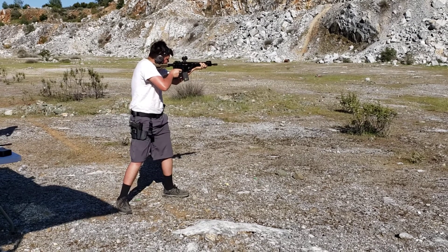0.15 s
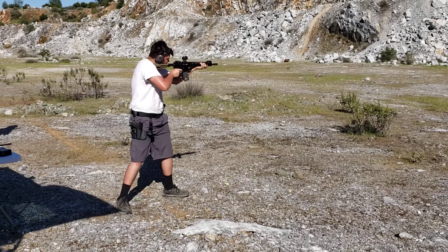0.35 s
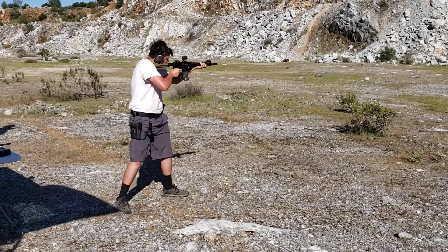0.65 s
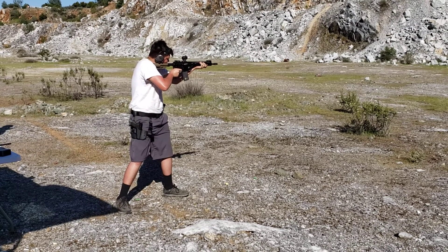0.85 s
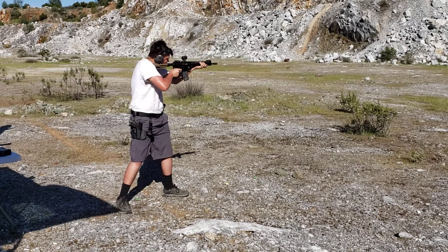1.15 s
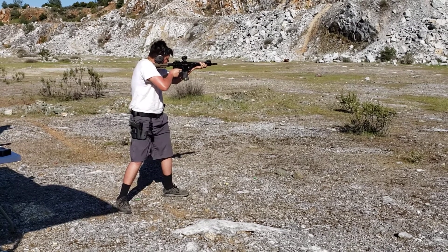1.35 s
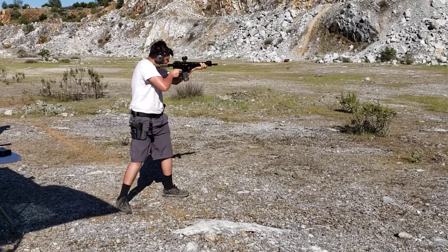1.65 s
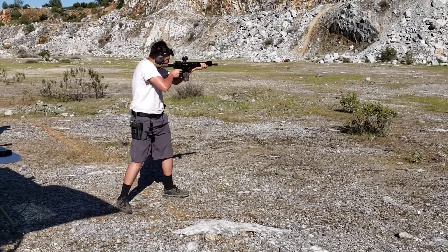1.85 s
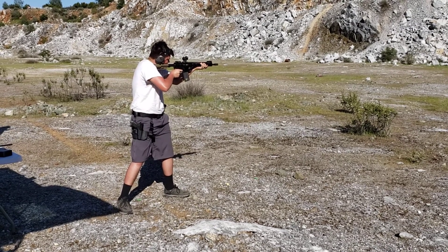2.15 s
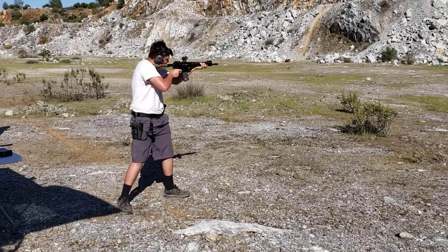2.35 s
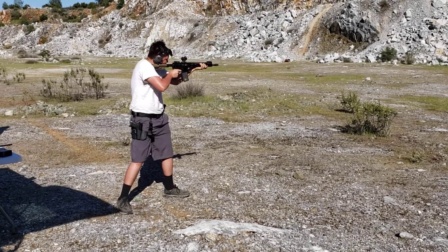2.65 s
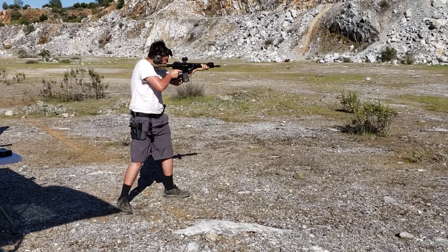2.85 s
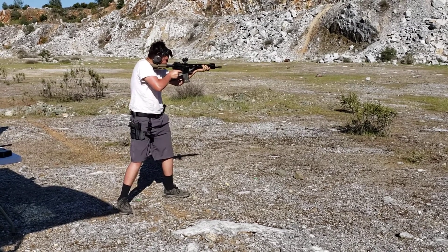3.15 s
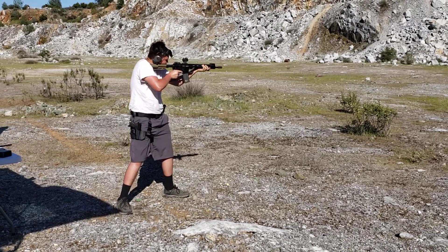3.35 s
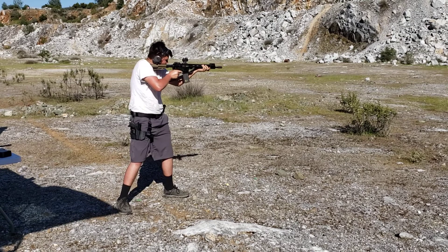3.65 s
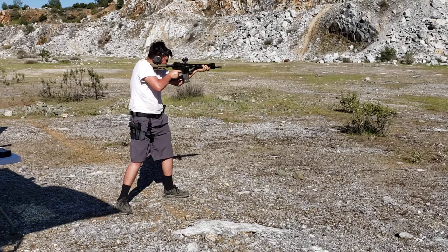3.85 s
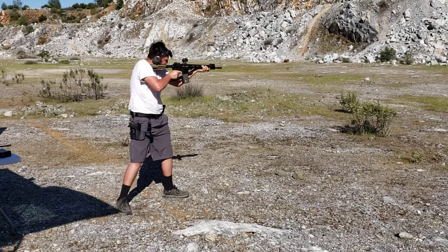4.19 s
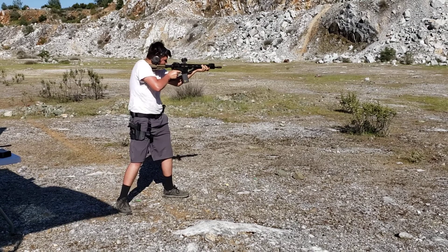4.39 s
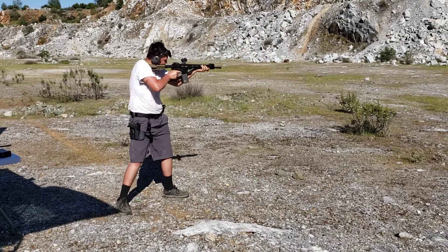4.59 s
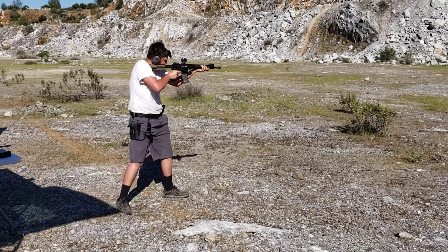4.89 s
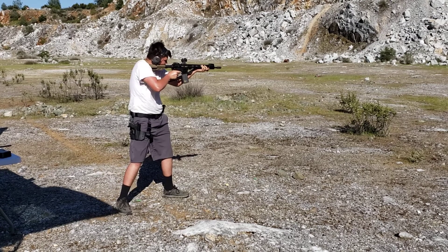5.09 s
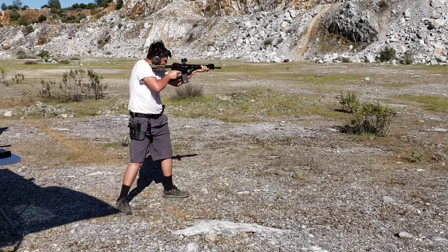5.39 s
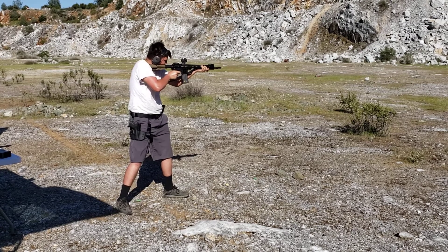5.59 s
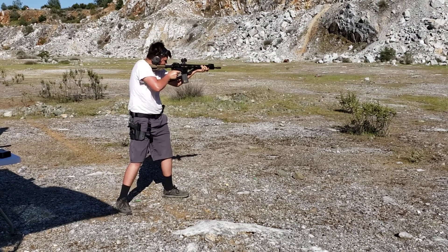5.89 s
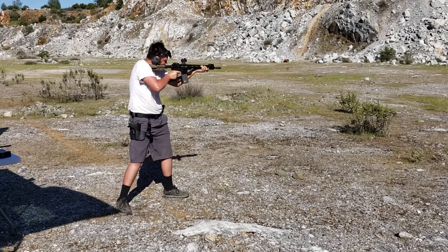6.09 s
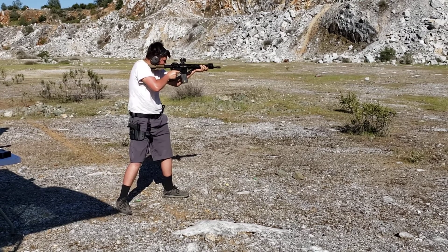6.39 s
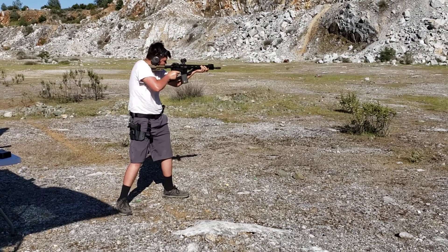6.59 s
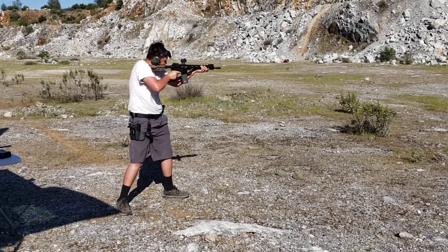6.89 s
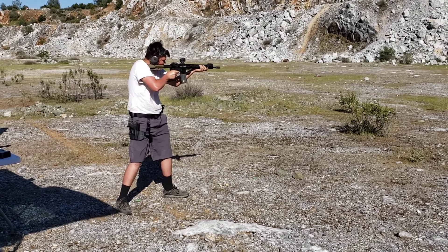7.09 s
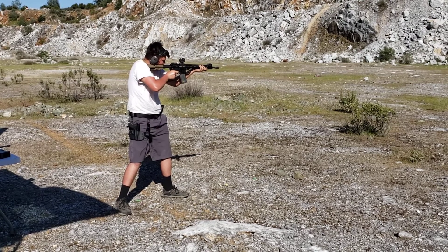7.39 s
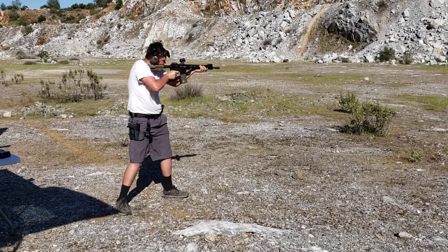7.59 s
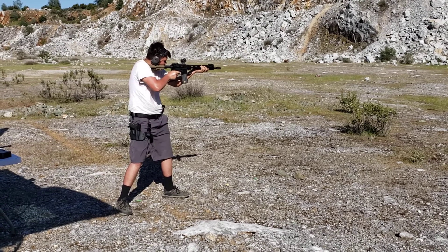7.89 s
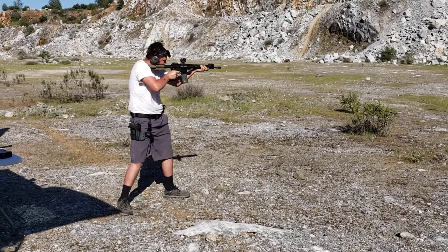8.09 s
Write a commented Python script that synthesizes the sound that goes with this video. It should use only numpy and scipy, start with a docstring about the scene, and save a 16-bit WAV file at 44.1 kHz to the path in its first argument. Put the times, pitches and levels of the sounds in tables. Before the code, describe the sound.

Heard in stereo from a few metres away, a rifle cracks six times in a wide rocky pit, slowly at first, then closer together. Steel answers almost at once, later for the far plate, with a hard slap and brief rough metallic ring; the fifth shot only returns a faint bullet crack. Slopes scatter each blast into a grainy, dulling roll. Between shots come soft air, faint rustle, small clicks and a low engine far off.

```python
"""A rifle fires six shots in a quarry, a few metres from the microphone, as an earlier shot still rolls away.
Each report is shock fronts, a deep thump, shaped noise and hollow tones; rock faces and three rubble slopes
throw it back as delayed noise for about a second. Five bullets clang on a near or a far steel plate, made of
noise slaps and rough, decaying sines. Bullet cracks return and spent cases tick as short noise bursts;
far off, sines make an engine's hum, over soft noise for still air and a faint rustle."""
import sys
import numpy as np
from scipy import signal
from scipy.fft import rfft, irfft, next_fast_len
from scipy.io import wavfile
from scipy.ndimage import uniform_filter1d, map_coordinates

SR = 44100
rng = np.random.default_rng(int(sys.argv[2]) if len(sys.argv) > 2 else 0)


def dump(signal):
    """Clip the signal to [-1, 1] and save it as 16-bit WAV at the path in sys.argv[1]."""
    limited = np.clip(np.atleast_2d(signal).T, -1, 1)
    pcm = np.round(limited * 32767).astype(np.int16)
    wavfile.write(sys.argv[1], SR, pcm)


N = 363384
T = np.arange(int(1.4 * SR)) / SR  # time axis of one event, s
AIR_LOSS_DB, AIR_POWER = 1.15, 1.71  # air absorption in dB per s at 1 kHz, and its growth with frequency


def amp(db):
    """Decibels to gain."""
    return 10 ** (np.asarray(db) / 20)


def unit(x):
    """Scale to rms 1."""
    return x / np.sqrt(np.mean(x ** 2) + 1e-20)


def along(points, hz):
    """(Hz, value) points read on a log frequency axis."""
    f, v = np.transpose(points)
    return np.interp(np.log(hz + 1), np.log(f + 1), v)


def filtered(x, response):
    """x times a response of frequency, zero-padded so that tails do not wrap round."""
    n = x.shape[-1]
    m = next_fast_len(n + 8192)
    return irfft(rfft(x, m) * response(np.fft.rfftfreq(m, 1 / SR)), m)[..., :n]


def absorption(hz, seconds):
    """Air takes more from the treble the longer the sound travels."""
    return amp(-AIR_LOSS_DB * seconds * (hz / 1000) ** AIR_POWER)


# likeness of the left and right microphone signals: (f/Hz, correlation 0-1)
STEREO_LIKENESS = [(60, .93), (130, .6), (350, .7), (700, .5), (2000, .35), (12000, .25)]


def noise(spectrum, lead_ms=0, size=len(T)):
    """Coloured stereo noise of rms 1 that reaches the left microphone lead_ms earlier."""
    def mid_side(hz):
        angle = np.arccos(np.clip(along(STEREO_LIKENESS, hz), -1, 1)) / 2
        return amp(along(spectrum, hz)) * np.array([np.cos(angle), np.sin(angle)])

    def left_lead(hz):
        return np.exp(1j * np.pi * np.outer([1, -1], hz) * lead_ms / 1000)

    mid, side = filtered(rng.standard_normal((2, size)), mid_side)
    return unit(filtered(np.array([mid + side, mid - side]), left_lead))


def drift(t, rate):
    """A random curve of straight segments, with rate new values a second."""
    knots = rng.standard_normal(int(t[-1] * rate) + 4)
    return map_coordinates(knots, [t * rate], order=1)


def patches(shape, depth_db, bins, frames):
    """Random gains over frequency and time, in blobs of the given size."""
    grid = uniform_filter1d(rng.standard_normal(shape), bins, 0)
    return amp(depth_db * unit(uniform_filter1d(grid, frames, 1)))


def burst(t60, attack, delay=0):
    """An envelope that rises and dies away; all times in s."""
    t = np.maximum(T - delay, 0)
    return (1 - np.exp(-t / attack)) * np.exp(-np.log(1000) * t / t60)


def varied(pattern, fresh, steady_hz):
    """Long waves scatter the same way for every shot; short ones differ each time."""
    turn = lambda hz: np.arctan(hz / steady_hz)
    steady = filtered(pattern, lambda hz: np.cos(turn(hz)))
    return steady + filtered(fresh, lambda hz: np.sin(turn(hz)))


def add(track, s, sound):
    """Mix a sound into the track at time s."""
    i = round(s * SR)
    a, b = max(i, 0), min(i + sound.shape[-1], N)
    track[:, a:b] += sound[..., a - i:b - i]


# tones of the far engine: (f/Hz, level/dB rms before the swell)
ENGINE_TONES = [(75.3, -81), (113.5, -87), (151, -79), (226, -87)]
HUM_CREST_S, HUM_WIDTH_S, HUM_SWELL_DB = 2.7, 2.2, 8  # the hum's level swells once and sinks back


def far_engine(waver=.9):
    """An engine far off: steady tones whose phases waver (rad) under one broad swell in level."""
    t = np.arange(N) / SR
    hum = np.zeros(N)
    for hz, db in ENGINE_TONES:
        hum += amp(db) * np.sqrt(2) * np.sin(2 * np.pi * hz * t + waver * drift(t, 4))
    swell = np.exp(-((t - HUM_CREST_S) / HUM_WIDTH_S) ** 4)
    return hum * amp(HUM_SWELL_DB * swell)


# colour of the still air: (f/Hz, level/dB per Hz, relative)
STILL_AIR = [(25, -16), (50, -6), (80, 0), (250, -4), (500, -11), (850, -6), (1400, -18), (2500, -22),
             (5000, -38), (16000, -42)]
# colour of the rustle: (f/Hz, level/dB per Hz, relative)
RUSTLE = [(100, -20), (350, -1), (550, -6), (850, 2), (1400, -10), (2300, -8), (4000, -28), (9000, -45)]


def air_and_rustle(air_db=-78, rustle_db=-75.5, depth_db=4.5):
    """Steady soft noise for still air, and a faint rustle whose level wanders at random."""
    t = np.arange(N) / SR
    rustle = amp(rustle_db + depth_db * drift(t, 14)) * noise(RUSTLE, size=N)
    return amp(air_db) * noise(STILL_AIR, size=N) + rustle


# small clicks of cases, stones and the trigger: (t/s, level/dB before the envelope, peak f/Hz)
CLICKS = [(1.6098, -40, 16000), (2.801, -37, 2500), (2.9812, -58, 7000), (5.0171, -52, 13000),
          (6.5601, -53, 6000), (6.9407, -55, 9000), (7.5, -54, 14000), (7.7244, -51, 13000),
          (7.928, -58, 7000)]


def ticks():
    """Small hard things knock together: short noise bursts, each with its own pitch region."""
    out = np.zeros((2, N))
    for s, db, hz in CLICKS:
        colour = [(hz / 8, -30), (hz / 2, -19), (hz, 0), (hz * 2, -22), (hz * 4, -45)]
        add(out, s, amp(db) * noise(colour) * burst(.035, .0003))
    return out


# colour of a returning bullet crack: (f/Hz, level/dB per Hz, relative)
BULLET_CRACK = [(50, 4), (130, 5), (300, 0), (1000, -7), (3000, -10), (5000, -8), (6500, -2), (9000, -14),
                (16000, -15)]
WHIP_DELAY_S, WHIP_DB = .0935, -25


def bullet_cracks():
    """A bullet that flies past the near plate sends its crack back."""
    out = np.zeros((2, N))
    for s, *_, struck, spot, slap_db in SHOTS:
        if struck != "near":
            add(out, s + WHIP_DELAY_S, amp(WHIP_DB) * noise(BULLET_CRACK) * burst(.06, .0008))
    return out


# colour of a bullet's slap on steel: (f/Hz, level/dB per Hz, relative)
STEEL_SLAP = [(40, -1), (150, 3), (270, 3), (450, -6), (680, -11), (950, -5), (1450, 3), (2300, 1),
              (3200, -9), (5000, -3), (7000, -4), (9000, -17), (12000, -11.5), (16000, -14)]


def plate(name, modes, delay, ring_db, slap_t60, splash_db, splash_t60, waver=.55):
    """A bullet slaps the steel, fragments spray, and the spot it strikes decides which modes ring."""
    out = np.zeros((2, N))
    for s, *_, struck, spot, slap_db in SHOTS:
        if struck != name:
            continue
        envelope = burst(slap_t60, .0003) + amp(splash_db) * burst(splash_t60, .003)
        add(out, s + delay, amp(slap_db) * noise(STEEL_SLAP, lead_ms=-.1) * envelope)
        for hz, t60, *levels in modes:
            start = rng.uniform(0, 2 * np.pi / 3, (2, 1))
            # each tone's phase wavers fast at random, which roughens the ring (waver in rad)
            phase = 2 * np.pi * hz * T + start + waver * drift(T, 70)
            add(out, s + delay, amp(ring_db + levels[spot]) * burst(t60, .001) * np.sin(phase))
    return out


# modes of the far plate: (f/Hz, t60/s, relative level/dB at each of two spots)
FAR_MODES = [(2040, .36, -37, -34), (4667, .3, -44, -46), (5100, 1, -46, -62), (5319, .45, -41, -37),
             (5669, .3, -57, -44), (5970, .55, -56, -42), (6831, .17, -47, -38), (8250, .3, -60, -45),
             (9900, .15, -60, -42), (11080, .3, -46, -45), (11260, .15, -45, -36), (11610, .26, -40, -38),
             (12800, .25, -45, -47), (13450, .24, -50, -49), (15180, .22, -47, -50)]
FAR_DELAY_S = .1965  # the bullet's flight plus the sound's way back


def far_plate():
    """The far steel, which answers each hit after the longer flight."""
    return plate("far", FAR_MODES, FAR_DELAY_S, ring_db=-1.5, slap_t60=.016, splash_db=-20, splash_t60=.22)


# modes of the near plate: (f/Hz, t60/s, relative level/dB at each of three spots)
NEAR_MODES = [(1841, 0.62, -33, -48, -46), (3198, 0.5, -52, -42, -42), (3639, 0.42, -46, -41, -43),
              (5324, 0.3, -23, -18, -38), (5873, 0.24, -35, -21, -50), (8372, 0.35, -36, -41, -42),
              (8738, 0.33, -33, -39, -60), (9878, 0.3, -59, -61, -39), (10910, 0.18, -49, -43, -34),
              (12170, 0.3, -40, -54, -36), (12603, 0.29, -39, -30, -25.5), (12870, 0.14, -49, -34, -42),
              (13700, 0.24, -52, -44, -94), (14930, 0.28, -75, -49, -39)]
NEAR_DELAY_S = .0901  # the bullet's flight plus the sound's way back


def near_plate():
    """The near steel, which answers each hit after the shorter flight."""
    return plate("near", NEAR_MODES, NEAR_DELAY_S, ring_db=-.7, slap_t60=.014, splash_db=-16.5, splash_t60=.23)


# colour of the rubble's scatter: (f/Hz, level/dB per Hz, relative, before air absorption)
RUBBLE_COLOUR = [(30, -19), (70, -7), (150, -2), (350, -3), (850, 1.5), (1800, -.5), (3200, -2.5),
                 (6500, -2.5), (8800, -10), (12000, -7), (16000, -7)]
# slopes whose scatter swells to a crest and fades: (crest delay t/s, level/dB, rise/dB per s, fall/dB per s)
RUBBLE_SLOPES = [(.155, -36.3, 170, 64), (.46, -39.3, 78, 56), (.93, -49.8, 70, 92)]


def rubble(lumps_db=2.3, slaps_db=1.5, grain_db=1.8):
    """The slopes roll on in lumps, slaps and stony grain, duller the further the sound has travelled."""
    hz, t, z = signal.stft(noise(RUBBLE_COLOUR, lead_ms=-.39), SR, nperseg=256)
    boulders = patches(z.shape[1:], lumps_db, bins=8, frames=9)
    z = z * absorption(hz[:, None], t) * boulders
    rolling = signal.istft(z, SR, nperseg=256)[1][:, :len(T)]
    swells = []
    for crest, db, rise, fall in RUBBLE_SLOPES:
        swells.append(amp(db - np.maximum(rise * (crest - T), fall * (T - crest))))
    roughness = amp(slaps_db * drift(T, 60) + grain_db * drift(T, 700))
    return rolling * np.linalg.norm(swells, axis=0) * roughness  # the slopes' powers add


# distinct faces, nearest first: (delay t/s, relative level/dB, t60/s, centre f/Hz)
ROCK_FACES = [(.144, -28, .22, 520), (.272, -40, .15, 720), (.274, -44.5, .16, 2400),
              (.425, -44, .18, 2300), (.473, -45, .2, 750), (.6, -49.5, .25, 550), (.655, -44, .12, 430),
              (.736, -49, .12, 700), (.79, -52, .55, 400), (.885, -49.5, .5, 380), (.888, -53.5, .17, 1600),
              (.965, -53.5, .35, 400)]
# colour of a face's slap: (multiple of its centre f, level/dB per Hz, relative)
ROCK_COLOUR = [(.1, -28), (.45, -18), (.7, -1), (1, 0), (1.45, -2), (2.1, -14), (5, -23), (12, -38),
               (24, -62)]


def rock_faces(blur=.011):
    """Each big face answers with a slap of its own pitch; the further off it is, the softer-edged and duller."""
    out = np.zeros((2, len(T)))
    for delay, db, t60, centre in ROCK_FACES:
        slap = noise([(centre * k, level) for k, level in ROCK_COLOUR])
        dulled = filtered(slap, lambda hz: absorption(hz, delay))
        out += amp(db + 3) * burst(t60, .002 + blur * delay, delay) * dulled
    return out


# hollow tones that the nearby ground and vehicle lend to the report: (f/Hz, relative level/dB, t60/s)
SITE_TONES = [(108, -31, .22), (132, -27, .25), (245, -23, .13), (287, -19.5, .16), (385, -23, .13),
              (431, -21, .18), (484, -19.5, .15), (622, -22, .15), (715, -24, .14), (802, -19.5, .15),
              (933, -21.5, .14), (1202, -29, .14), (1660, -28, .18)]


def hollow(delay=.009, lead_s=.00025):
    """The site's short hollow ring, which arrives from the left: its tones lead in phase there."""
    t = T + np.array([[lead_s], [0]])
    ring = np.zeros((2, len(T)))
    for hz, db, t60 in SITE_TONES:
        ring += amp(db) * burst(t60, .003, delay) * np.sin(2 * np.pi * (hz * t + rng.random()))
    return ring


# colour of the bright first crack: (f/Hz, level/dB per Hz, relative)
CRACK_COLOUR = [(30, -18), (160, -6), (260, 0), (450, -2), (900, -1), (1500, -6), (3000, -9), (4200, -13.5),
                (6500, -12.5), (8800, -26), (12500, -14), (16000, -15.5)]
# colour of the duller body: (f/Hz, level/dB per Hz, relative)
BODY_COLOUR = [(30, -9), (90, -9), (170, -6), (260, -2), (480, -1), (800, -3), (1300, -7.5), (3000, -10.5),
               (4200, -13), (6500, -13.5), (8800, -26), (12500, -19), (16000, -21)]
CRACK_DB, CRACK_ATTACK_S, CRACK_T60_S = 7.3, .006, .026
BODY_DB, BODY_DELAY_S, BODY_ATTACK_S, BODY_T60_S = -7.4, .004, .011, .152


def roar():
    """Stony ground scatters the blast: a bright crack first, then a duller body."""
    crack = amp(CRACK_DB) * burst(CRACK_T60_S, CRACK_ATTACK_S) * noise(CRACK_COLOUR, lead_ms=.04)
    body = amp(BODY_DB) * burst(BODY_T60_S, BODY_ATTACK_S, BODY_DELAY_S) * noise(BODY_COLOUR, lead_ms=.22)
    return crack + body


# one blast, direct and off nearby ground and a vehicle: (delay t/s, relative level/dB, length/s)
SHOCK_FRONTS = [(.0018, -11, .0003), (.0044, -5, .0006), (.016, -6.5, .0009), (.0198, -12, .0004),
                (.0422, -15, .0006)]


def pressure(thump_db, thump_hz=50, crest=.0185, width=.0152, lead_s=.0009):
    """Shock fronts, each a push and a suction, over a deep thump of two or three swings."""
    t = T - crest + np.array([[lead_s], [-lead_s]]) / 2  # the thump leads on the left
    wave = amp(thump_db) * np.cos(2 * np.pi * thump_hz * t) * np.exp(-(t / width) ** 2)
    for delay, db, length in SHOCK_FRONTS:
        u = np.maximum(T - delay, 0) / length
        wave = wave + amp(db) * (1 - u) * np.exp(-u) * (1 - np.exp(-12 * u))
    return wave


# shots: (t/s, relative level/dB, deep thump level/dB, hollow ring level/dB, lag of the first bounce/s,
#   its strength 0-1, plate struck, spot on the plate, bullet slap level/dB)
SHOTS = [(-.87, 1, -16, 0, .0011, .4, "none", 0, 0), (.8990, .2, -13.2, -1, .00105, .4, "far", 0, -11.5),
         (2.2504, .6, -15, 0, .00108, .7, "far", 1, -15),
         (4.2833, .3, -17.3, -3.5, .00068, .5, "near", 0, -7),
         (6.1906, 0, -14.5, .5, .00064, .35, "near", 1, -7.5),
         (6.9731, .8, -17, .5, .00055, .35, "none", 0, 0),
         (7.9612, .4, -21.5, -1, .0006, .1, "near", 2, -7)]


def rifle(soft_hz=2600):
    """Every shot excites the same ground and the same walls; one close, soft bounce combs each report."""
    out = np.zeros((2, N))
    ground, slopes, ring, faces = roar(), rubble(), hollow(), rock_faces()
    for s, db, thump_db, hollow_db, lag, bounce, *_ in SHOTS:
        # the bounce loses its treble above soft_hz
        comb = lambda hz: 1 + bounce * np.exp(-2j * np.pi * hz * lag) / (1 + (hz / soft_hz) ** 4)
        close = filtered(varied(ground, roar(), steady_hz=300), comb)
        blast = pressure(thump_db) * amp([[.3], [-.3]])  # left, right dB
        report = blast + close + amp(hollow_db) * ring
        echoes = faces + varied(slopes, rubble(), steady_hz=150)
        add(out, s, amp(db) * (report + echoes))
    return out


def scene():
    """Background, small sounds, steel plates and rifle, slightly louder on the left."""
    background = far_engine() + air_and_rustle()
    small_sounds = ticks() + bullet_cracks()
    mix = background + small_sounds + far_plate() + near_plate() + rifle()
    return mix * amp([[.5], [-.5]])  # left, right dB


TOP_HZ = 16100  # band limit of the microphone's signal


def record(dry, ceiling=.95):
    """The microphone's signal has its highest peaks rounded off and loses what lies above its band limit."""
    rounded = dry / (1 + np.abs(dry / ceiling) ** 6) ** (1 / 6)
    return filtered(rounded, lambda hz: 1 / (1 + (hz / TOP_HZ) ** 100))


dry = scene()
out = record(dry)
dump(out)
```